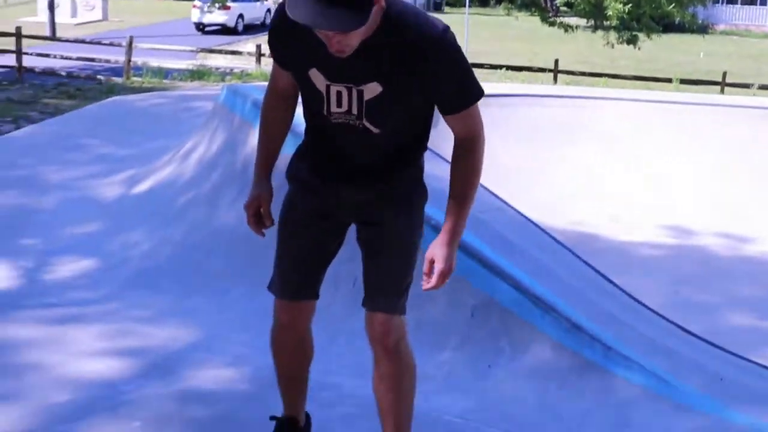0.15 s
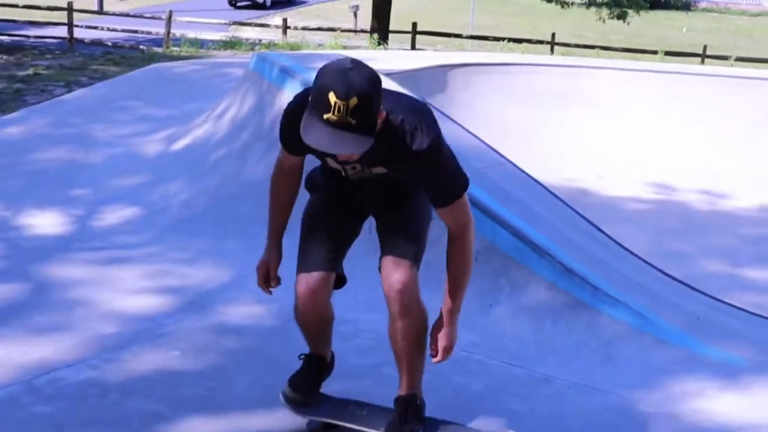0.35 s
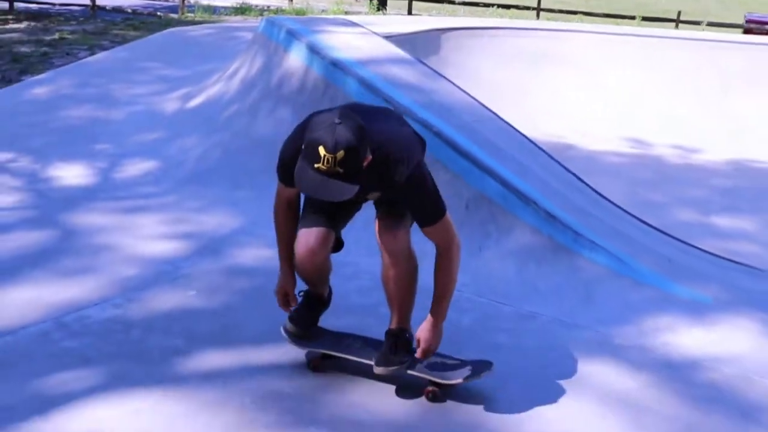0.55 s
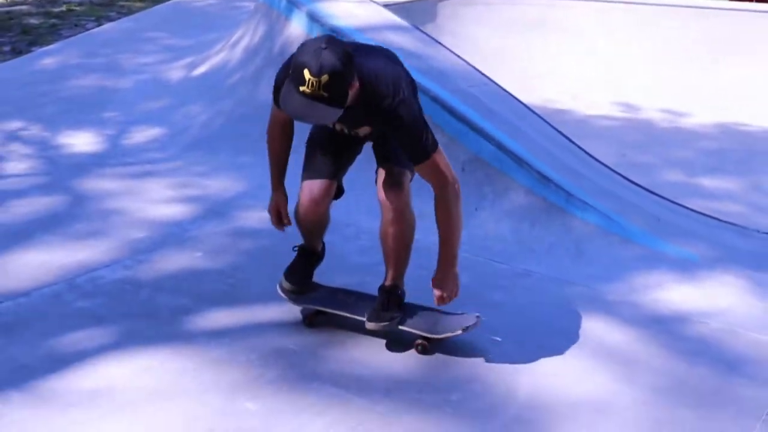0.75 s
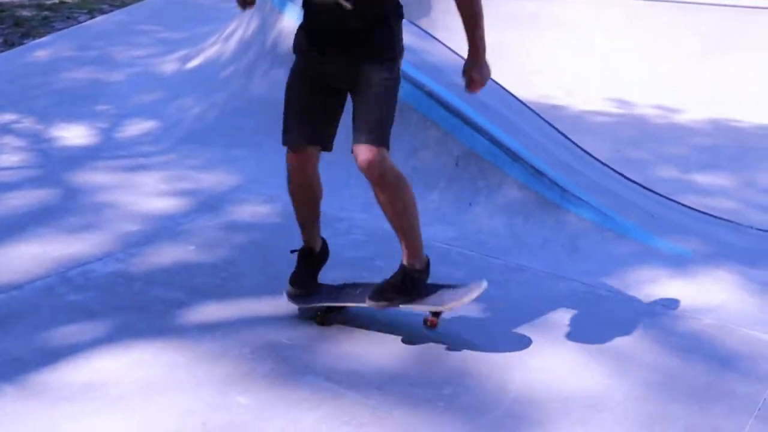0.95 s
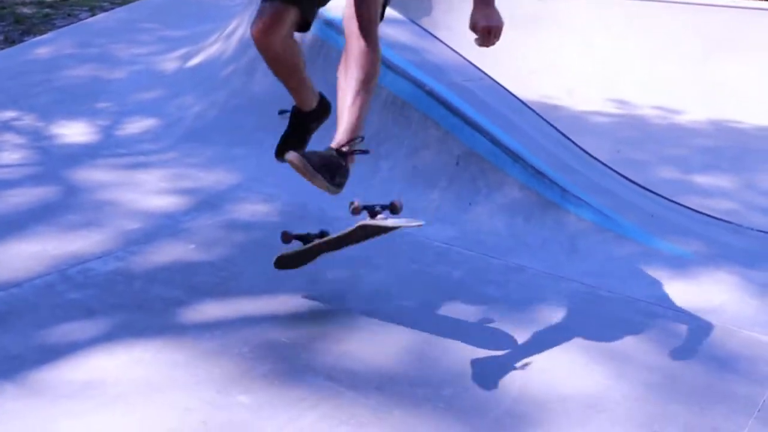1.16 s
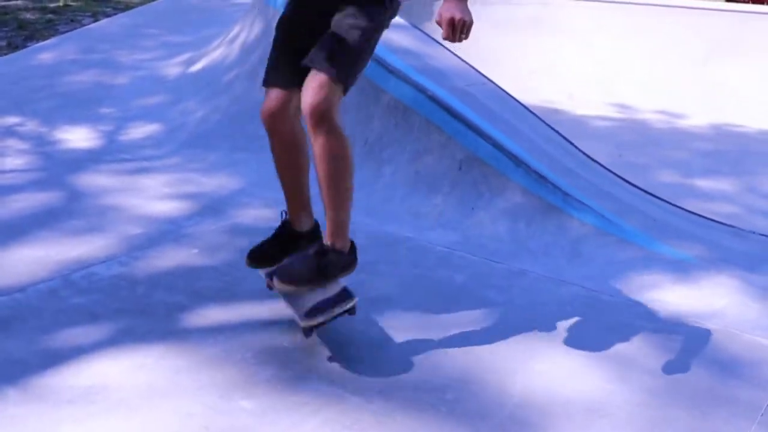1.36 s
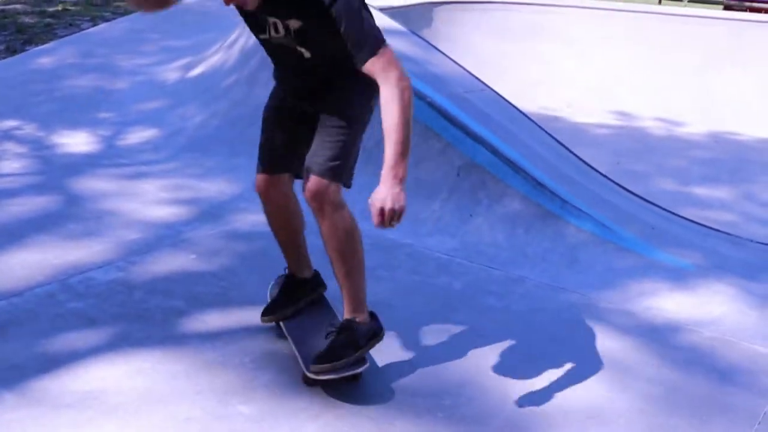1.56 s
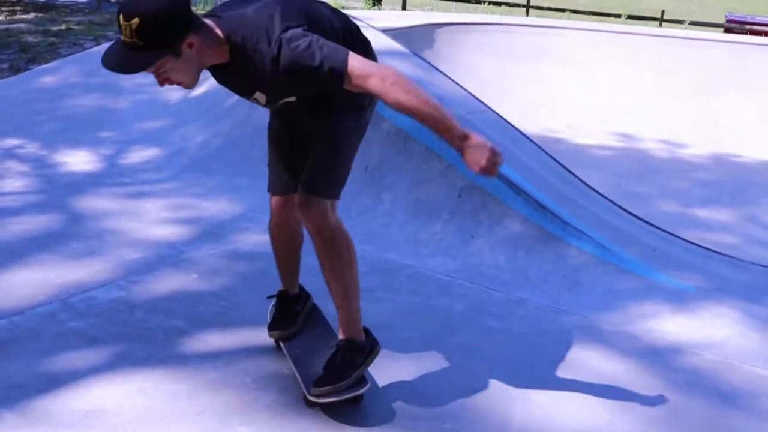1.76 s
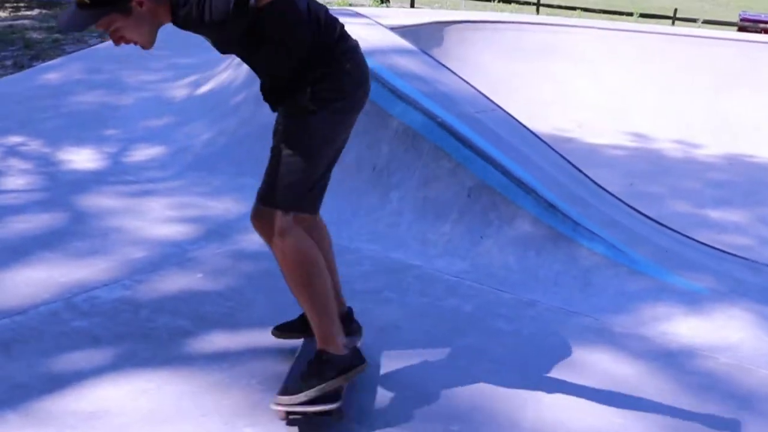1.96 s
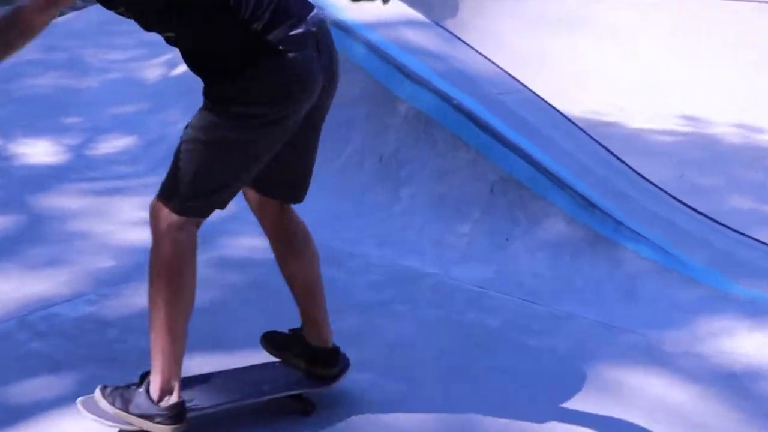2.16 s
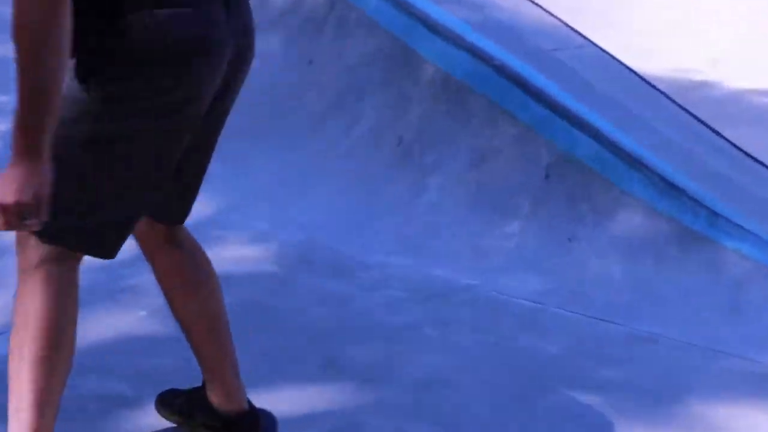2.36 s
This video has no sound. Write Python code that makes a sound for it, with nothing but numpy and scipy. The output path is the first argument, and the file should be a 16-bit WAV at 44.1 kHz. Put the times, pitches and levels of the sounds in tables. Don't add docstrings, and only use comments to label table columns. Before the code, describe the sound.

Skateboard flip on smooth concrete: one loud snap, a heavier clattering landing, knocks and a brief squeal

```python
import sys
import numpy as np
from scipy import signal
from scipy.fft import rfft, irfft
from scipy.io import wavfile
from scipy.ndimage import uniform_filter1d

SR = 44100
rng = np.random.default_rng(int(sys.argv[2]) if len(sys.argv) > 2 else 0)


def magnitude_from_level(level_db):
    exponent = np.asarray(level_db, float) / 20
    return 10 ** exponent


def dump_mix(stems):
    frames = np.atleast_2d(stems).T
    limited = np.clip(frames, -1, 1)
    pcm = np.round(limited * 32767).astype(np.int16)
    wavfile.write(sys.argv[1], SR, pcm)


N = 106325


def unit(x):
    return x / np.sqrt(np.mean(x ** 2) + 1e-30)


def band(x, hz, width):
    return signal.lfilter(*signal.iirpeak(hz, hz / width, fs=SR), x)


def steep(x, hz, width):
    return band(band(x, hz, width), hz, width)


def decay(t, t60):
    return np.exp(-np.log(1000) * t / t60)


def walk(rate):
    hold = max(int(SR / rate), 1)
    steps = np.repeat(rng.standard_normal(N // hold + 1), hold)
    return 1.016 * uniform_filter1d(uniform_filter1d(steps, hold), hold)[:N]


def coloured(points):
    point_hz, point_db = np.array(points).T
    hz = np.arange(N // 2 + 1) * SR / N + 1
    gain = magnitude_from_level(np.interp(np.log(hz), np.log(point_hz), point_db))
    return unit(irfft(rfft(rng.standard_normal(N)) * gain, N))


def level_curve(points):
    return magnitude_from_level(np.interp(np.arange(N) / SR, *np.array(points).T))


def add(out, start_s, x):
    i = max(int(start_s * SR), 0)
    out[i:i + len(x)] += x[:N - i]


def swell(length_s):
    rise_share, fall_share = 0.2755, 0.30286
    u = np.linspace(0, 1, int(length_s * SR))
    ramp = np.minimum(u / rise_share, (1 - u) / fall_share)
    return np.sin(np.pi / 2 * np.clip(ramp, 0, 1)) ** 2


def grit(per_s, length_s, spread_db):
    hit, sign, rarity = rng.random((3, int(length_s * SR)))
    size = magnitude_from_level(-spread_db * np.log(rarity + 0.03))
    return unit((hit < per_s / SR) * np.sign(sign - 0.5) * size + 1e-9)


# frequency in Hz, density in dB per Hz.
WIND_SPECTRUM = [(8.8, -40), (15, -2), (54, -2.5), (115, -14), (213, -30), (265, -30), (400, -39.5),
                 (520, -98.5), (880, -120)]
# time in seconds, level in dB.
GUST_LEVELS = [(0, -34), (.2, -39.5), (.3, -35.5), (.45, -37.5), (.66, -37.5), (.77, -31), (.84, -35),
               (.9, -50.5), (1.04, -38.5), (1.14, -30.5), (1.26, -29), (1.4, -29.5), (1.62, -38.5),
               (1.78, -34.5), (1.92, -38), (2.05, -43.5), (2.25, -46.5), (2.41, -43.5)]


def wind():
    rumble = coloured(list(WIND_SPECTRUM) + [(700, -61)])
    return unit(rumble * magnitude_from_level(2.2 * walk(15.371))) * level_curve(GUST_LEVELS)


# frequency in Hz, density in dB per Hz.
TRAFFIC_SPECTRUM = [(120, -11.5), (200, 0.5), (304, -9), (471, -3), (535, -7.5), (994, -3.5), (4110, -25),
                    (4590, -26.5), (15600, -34.5)]
# time in seconds, level in dB.
TRAFFIC_LEVELS = [(0, -44.5), (.4, -48), (.8, -47.5), (1.4, -48), (1.8, -44.5), (2.41, -45)]


def traffic():
    hum = coloured([(80, -49)] + list(TRAFFIC_SPECTRUM))
    return hum * magnitude_from_level(1.0 * walk(9.7628)) * level_curve(TRAFFIC_LEVELS)


def echo(board):
    level_db, t60_s, delay_s = -38, 0.971, 0.008
    t = np.arange(15000) / SR
    tail = unit(band(rng.standard_normal(len(t)), 835.5, 4135)) * decay(t, t60_s) * (t > delay_s)
    tail *= magnitude_from_level(level_db) / np.sqrt(np.sum(tail ** 2))
    return signal.fftconvolve(board, tail)[:N]


# start in seconds, level in dB, centre frequency in Hz.
GRIT_TICKS = [(0.567, -27.5, 2900), (.978, -46, 13100), (.989, -44.5, 10880), (1.006, -37.5, 12540),
              (1.007, -30, 4798), (1.016, -28, 4333), (1.022, -47.5, 10200), (1.040, -50.5, 9990),
              (1.118, -34.5, 10390), (1.402, -45.5, 5280), (1.613, -42.5, 10140), (1.142, -38, 4584),
              (1.149, -46.5, 4196), (1.766, -38.5, 3503), (1.776, -42, 4467), (1.712, -36.5, 5068),
              (1.979, -22, 3102), (1.985, -9, 3398)]


def ticks():
    decay_s = 0.0014012
    out, t = np.zeros(N), np.arange(600) / SR
    for start_s, db, hz in GRIT_TICKS:
        burst = rng.standard_normal(len(t)) * np.exp(-t / decay_s)
        add(out, start_s, magnitude_from_level(db) * 4 * steep(burst, hz, 0.4224 * hz))
    return out


# start in seconds, length in seconds, level in dB, treble in dB.
SHOE_SCUFFS = [(0, 0.01534, -52, 2.5), (0.176, 0.02156, -51, -11), (0.293, 0.08508, -51, -1),
               (0.418, 0.08222, -57, 3.5), (0.924, 0.0952, -37.5, -3.5), (1.008, 0.05824, -48.5, 1.5),
               (1.043, 0.0851, -41.5, 1), (1.081, 0.03804, -29, 1), (1.107, 0.06214, -52.5, 8.5),
               (1.567, 0.15372, -47, 4.5), (1.714, 0.05857, -47, 2.5), (1.859, 0.1072, -37.5, -56.5),
               (1.897, 0.07477, -41.5, 9), (1.987, 0.0211, -42.5, 7.5), (2.057, 0.04319, -44, 6),
               (2.149, 0.03196, -19, 10.5), (2.207, 0.11807, -47.5, 6)]
# frequency in Hz, width in Hz, level in dB.
TAPE_BODY = [(2700, 1300, 0), (3800, 1000, -6), (5400, 1900, -7)]
# frequency in Hz, width in Hz, level in dB.
TAPE_TREBLE = [(10300, 5500, -12), (13500, 5000, -18)]


def scuffs():
    out = np.zeros(N)
    for start_s, length_s, db, treble_db in SHOE_SCUFFS:
        grains = grit(2000, length_s, 2.152)
        body = 0
        for hz, width, part_db in TAPE_BODY:
            tilt_db = treble_db * (hz - 2700) / 6000
            body = body + magnitude_from_level(part_db + tilt_db) * steep(grains, hz, width)
        x = unit(body)
        for hz, width, part_db in TAPE_TREBLE:
            x = x + magnitude_from_level(part_db + treble_db) * unit(steep(grains, hz, width))
        add(out, start_s, magnitude_from_level(db) * swell(length_s) * x)
    return out


# start in seconds, length in seconds, level in dB.
BOARD_DRAGS = [(0.95, 0.08072, -39), (1.093, 0.031495, -24.5), (1.12, 0.10762, -38.5),
               (1.2, 0.07082, -45.5), (1.464, 0.0335, -27), (1.492, 0.068124, -20.5), (1.576, 0.10251, -33),
               (1.678, 0.11232, -42), (1.82, 0.05099, -42.5), (1.88, 0.1577, -38), (1.998, 0.0351, -47),
               (2.029, 0.017035, -34.5), (2.045, 0.09889, -39), (2.141, 0.02905, -16),
               (2.179, 0.01211, -22), (2.22, 0.12794, -39.5), (2.335, 0.1047, -47)]


def drags():
    focus_hz = 1191.3
    out = np.zeros(N)
    for start_s, length_s, db in BOARD_DRAGS:
        grains = grit(2500, length_s, 3.358)
        body = 0
        for k, (hz, mode_db, _) in enumerate(DECK_MODES):
            body = body + (-1) ** k * magnitude_from_level(0.812 * mode_db) * band(grains, hz, 0.15972 * hz)
        add(out, start_s, magnitude_from_level(db) * swell(length_s) * unit(band(body, focus_hz, 1.0596 * focus_hz)))
    return out


# frequency in Hz, level in dB.
WHEEL_MODES = [(3650, -60), (4650, -57), (5550, -58), (6500, -63)]


def wheel_ring():
    start_s, length_s = 2.2, 0.1779
    out, envelope = np.zeros(N), swell(length_s)
    for hz, db in WHEEL_MODES:
        tone = unit(steep(rng.standard_normal(len(envelope)), hz, 339))
        add(out, start_s, magnitude_from_level(db) * envelope * tone)
    return out


def rubbing():
    return (scuffs() + drags() + wheel_ring()) * magnitude_from_level(2.0 * walk(90))


# start in seconds, length in seconds, first Hz, last Hz, level in dB.
RUBBER_CHIRPS = [
    (1.923, 0.032, 1750, 2900, -19),
    (1.868, 0.016, 2800, 3000, -36),
    (.903, 0.018, 13300, 15200, -50),
    (.924, .014, 13000, 15200, -58),
]


def chirps():
    out = np.zeros(N)
    for start_s, length_s, from_hz, to_hz, db in RUBBER_CHIRPS:
        n = int(length_s * SR)
        hz = np.linspace(from_hz, to_hz, n) * (1 + 0.0442 * walk(541.3)[:n])
        phase = 2 * np.pi * np.cumsum(hz) / SR
        tone = np.sin(phase) + 0.09 * np.sin(2 * phase)
        add(out, start_s, magnitude_from_level(db) * np.hanning(n) ** 2 * tone)
    return out


# time in seconds, pitch in Hz, level in dB, second partial in dB.
SQUEAL_COURSE = [
    (2.158, 939.8, -37.5, -10.5),
    (2.159, 935.9, -6, 6),
    (2.166, 932.2, -0.5, -13),
    (2.171, 909, -5.5, 1.5),
    (2.181, 888.7, -11.5, 10.5),
    (2.184, 962.5, -28, 4),
    (2.19, 916.6, -32, -7),
    (2.202, 904, -42.5, 8.5),
    (2.211, 898, -71, -6),
]
UPPER_PARTIALS = [-7.5, -9.5, -10.5, -13.5, -25, -30, -20, -18.5, -39.5, -19.5]


def squeal():
    t, (s, hz, db, second_db) = np.arange(N) / SR, np.array(SQUEAL_COURSE).T
    phase = 2 * np.pi * np.cumsum(np.interp(t, s, hz) * (1 + 0.0169 * walk(500))) / SR
    x = np.sin(phase) + magnitude_from_level(np.interp(t, s, second_db)) * np.sin(2 * phase + 1)
    for k, part_db in enumerate(UPPER_PARTIALS, start=3):
        x += magnitude_from_level(part_db + 4.772 * walk(200)) * np.sin(k * phase + k * k)
    return x * magnitude_from_level(np.interp(t, s, db)) * (t > s[0]) * (t < s[-1])


# start in seconds, level in dB,
# frequency in Hz,
DECK_KNOCKS = [(.567, -40.5, 2189, 0.00498), (.5672, -29, 3904, 0.00542), (1.0815, -2, 4399, 0.007144),
               (1.083, -17.5, 800.6, 0.02477), (1.084, -22.5, 2151, 0.01625), (1.0895, -5, 599.2, 0.012086),
               (1.124, -20.5, 1104, 0.02484), (1.141, -17.5, 1300, 0.01357), (1.149, -16, 1530, 0.007533),
               (1.155, -22, 960, 0.02268), (1.17, -27, 2031, 0.01258), (1.175, -17.5, 1317, 0.01636),
               (1.183, -30.5, 1517, 0.0138), (1.199, -22, 1443, 0.01124), (1.205, -28, 1300, 0.0198),
               (1.467, -6.5, 795.2, 0.006212), (1.483, -3, 2571, 0.00833), (1.488, -2.5, 1591, 0.02011),
               (1.516, -2, 1176, 0.0573), (1.501, -6, 1112, 0.03417), (1.508, -7, 1300, 0.0265),
               (1.528, -0.5, 895.4, 0.02106), (1.533, 2, 1300, 0.01503), (1.544, -4.5, 1210, 0.01094),
               (1.547, -19, 931.9, 0.06133), (1.585, -35.5, 1164, 0.01434), (1.604, -35, 1217, 0.01283),
               (1.615, -27, 1840, 0.01462), (1.627, -25, 1300, 0.00851), (1.636, -26.5, 1300, 0.01105),
               (1.659, -16.5, 1300, 0.01328), (1.7114, 5, 1166, 0.005995), (1.724, -15, 1010, 0.01455),
               (1.784, -26.5, 1652, 0.013845), (1.784, -30.5, 790.4, 0.024), (1.839, -28, 1708, 0.01947),
               (1.887, -26, 1332, 0.03057), (1.9049, -12.5, 1322, 0.01877), (1.9766, 2, 935.6, 0.00813),
               (1.978, -9.5, 691.9, 0.07346), (1.9849, 4.5, 1088, 0.02336), (1.991, -11, 588.9, 0.05316),
               (2.003, -16.5, 1587, 0.03146), (2.035, -32.5, 1405, 0.01356), (2.089, -28.5, 511.8, 0.066),
               (2.144, -7.5, 3701, 0.01784), (2.146, -7, 1508, 0.01332), (2.171, -1, 3523, 0.02522),
               (2.012, -25.5, 1030, 0.0225)]


def knocks():
    rise_s = 0.00035306
    out, t = np.zeros(N), np.arange(2500) / SR
    for start_s, db, hz, t60 in DECK_KNOCKS:
        ring = np.sin(2 * np.pi * hz * t) * decay(t, t60) * (1 - np.exp(-t / rise_s))
        add(out, start_s, -magnitude_from_level(db) * ring)
    return out


def crack(t):
    decay_s = 0.0020712
    hiss = rng.standard_normal(len(t))
    bright = steep(hiss, 3521.2, 2603) + 0.3212 * steep(hiss, 7666, 8548)
    low = 1.0931 * steep(hiss, 2085.6, 2473.5)
    return bright * np.exp(-t / decay_s) + low * np.exp(-t / (2 * decay_s))


# frequency in Hz, level in dB, t60 in seconds.
DECK_MODES = [(352.27, -0.5, 0.06441), (519.94, 2.5, 0.059504), (647.06, -3.5, 0.01797),
              (791.37, -5.5, 0.04351), (1027.6, -6, 0.02442), (1123.3, -3.5, 0.060534), (1300, -3, 0.0337),
              (1660, -5, 0.06833), (1879.2, -6.5, 0.02583), (2266.2, -8, 0.05469), (2900, -15, 0.04894),
              (3608.8, -9, 0.01354), (4074.5, -18, 0.00578), (4766, -12, 0.03286)]
# start in seconds, level in dB, most excited region in octaves
# from 1 kHz, ring factor (a multiple of t60), crack level in dB.
DECK_BLOWS = [(1.0819, 5.5, -0.2278, 0.4509, 3), (1.0832, 4, -0.9452, 0.5496, -42),
              (1.1224, -26, 0.248, 4.174, -22.5), (1.4668, -8.5, 0.831, 0.3472, -35.5),
              (1.4836, 3, 1, 0.6998, 6.5), (1.4869, 12.5, 0.1344, 0.4362, -31.5),
              (1.5, -19, -0.065, 0.765, -16.5), (1.508, -29, 0.68, 0.439, -20.5),
              (1.5147, 7, 0.148, 0.8542, -2), (1.519, 11, 0.3966, 0.6119, 0.5),
              (1.524, 9.5, -0.9224, 0.1593, -19), (1.535, -0.5, 0.55, 0.1655, -16),
              (1.545, -1, -0.0076, 0.329, -20), (1.664, -26, 0.74, 0.403, -49.5),
              (1.713, -19.5, -0.1927, 0.8666, -31.5), (1.7212, -16, 0.1907, 0.8927, -42),
              (1.905, -28, 0.01, 0.2318, -43), (1.977, 1, 0.2647, 0.7085, -21),
              (1.981, -9.5, -0.4605, 0.2234, -9.5), (1.985, 8, 0.2044, 0.41586, -7),
              (2.003, -23, 0.652, 0.5548, -47.5), (2.1392, -4, -0.216, 1.487, 2.5),
              (2.1444, -4.5, -0.1285, 1.6803, -2), (2.1541, 1, -0.6914, 0.3864, -21)]


def blows():
    region_oct, scatter_db, push_s = 0.9229, 5, 0.0000653
    out, t, (hz, mode_db, t60) = np.zeros(N), np.arange(4000) / SR, np.array(DECK_MODES).T
    sign = (-1) ** np.arange(len(hz))
    for start_s, db, region, ring, crack_db in DECK_BLOWS:
        level_draw, pitch_draw = rng.standard_normal((2, len(hz)))
        distance = (np.log2(hz / 1e3) - region) / region_oct
        gain = sign * magnitude_from_level(mode_db + scatter_db * level_draw - 5.425 * distance ** 2)
        tones = np.sin(2 * np.pi * np.outer(hz * (1 + 0.028845 * pitch_draw), t))
        x = gain @ (tones * decay(t, ring * t60[:, None]))
        x *= (1 - np.exp(-t / push_s)) / np.sqrt(np.sum(gain ** 2))
        add(out, start_s, magnitude_from_level(db) * x + magnitude_from_level(crack_db) * crack(t))
    return out


def scene():
    board = blows() + knocks() + ticks() + rubbing() + squeal() + chirps()
    return (board + echo(board) + wind() + traffic())[None]


def low_pass(x):
    return signal.sosfilt(signal.butter(12, 15700, fs=SR, output="sos"), x)


def record(dry):
    ceiling = 1.01
    mix = np.clip(dry, -ceiling, ceiling)
    return low_pass(mix)


dry = scene()
out = record(dry)
dump_mix(out)
```